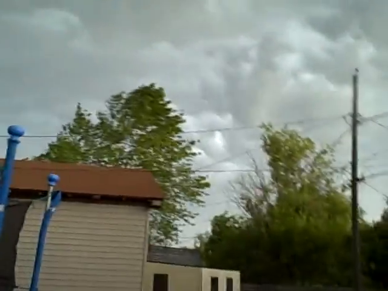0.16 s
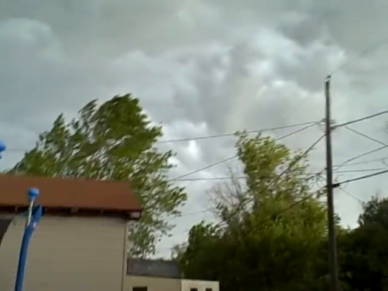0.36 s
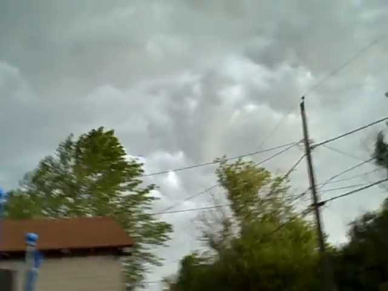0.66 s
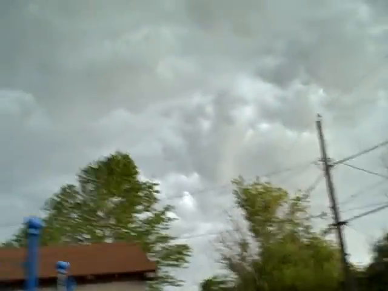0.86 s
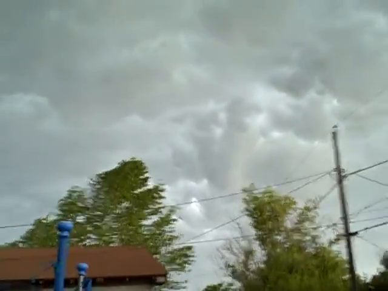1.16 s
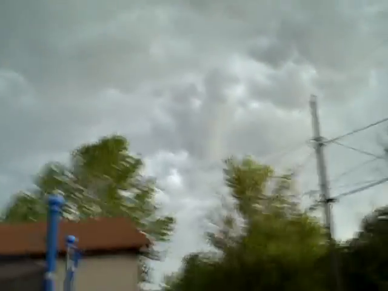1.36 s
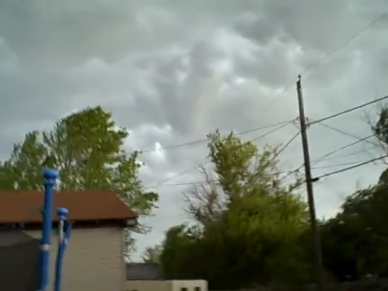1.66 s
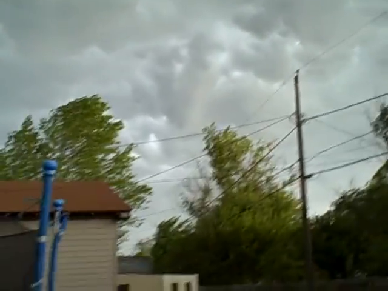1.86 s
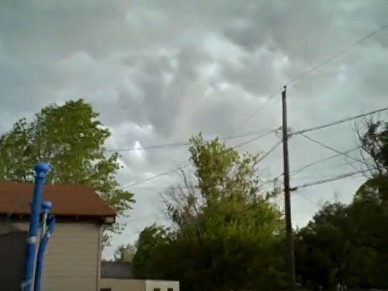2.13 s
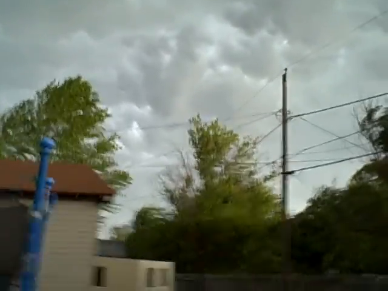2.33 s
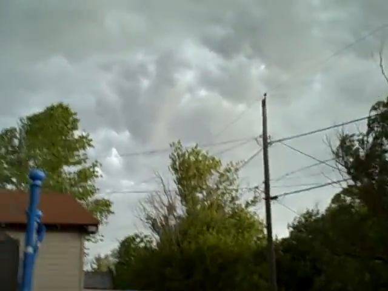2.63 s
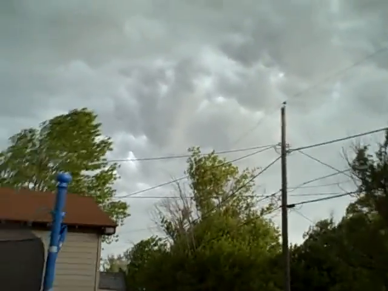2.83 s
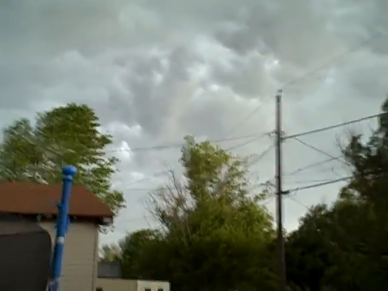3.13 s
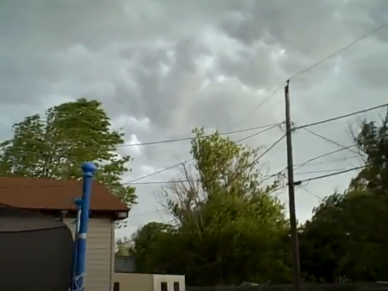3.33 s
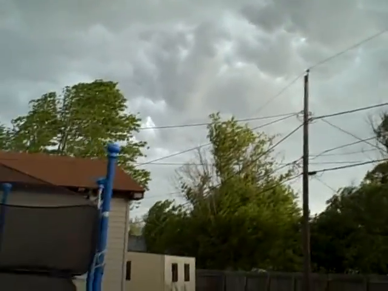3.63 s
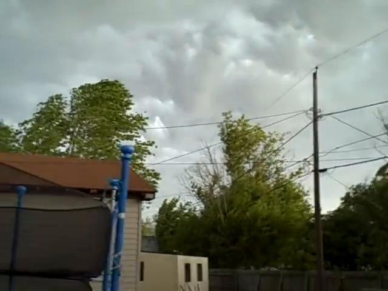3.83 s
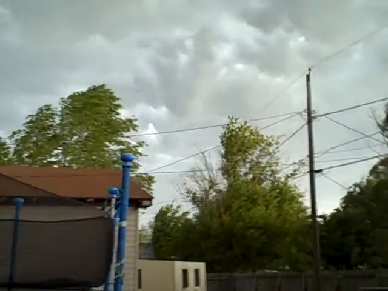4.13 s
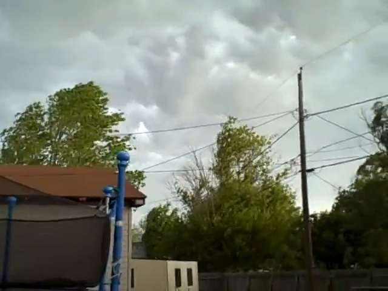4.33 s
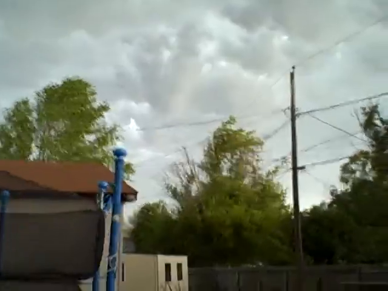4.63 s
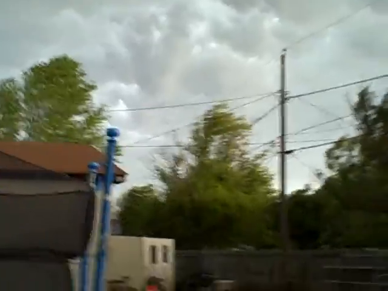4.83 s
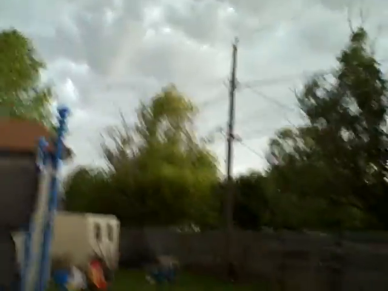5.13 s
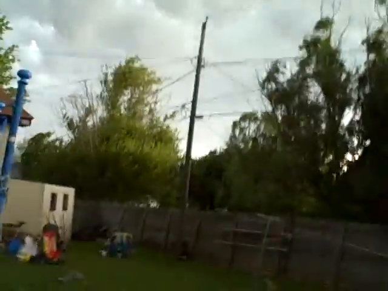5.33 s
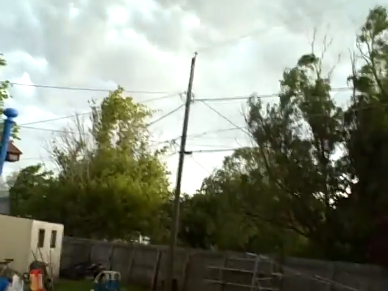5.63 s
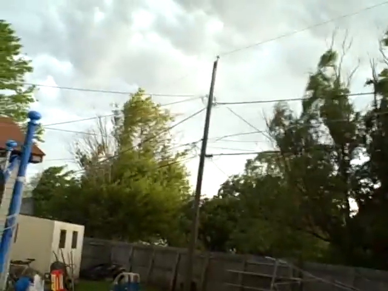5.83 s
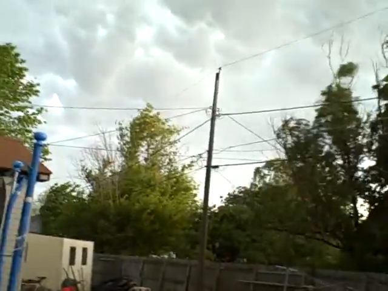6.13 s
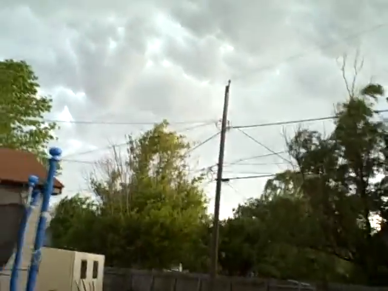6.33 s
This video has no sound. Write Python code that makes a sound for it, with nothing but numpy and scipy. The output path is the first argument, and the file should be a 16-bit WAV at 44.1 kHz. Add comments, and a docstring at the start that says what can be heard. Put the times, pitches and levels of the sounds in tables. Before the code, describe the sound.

Storm gusts slam and rip across a handheld microphone in a back yard, then soft low puffs remain over a leafy, hissing rush.

```python
"""Storm gust in a back yard

For three seconds wind beats straight on the microphone: deep pressure lumps, a flutter of small eddies,
a rough crackle, short rips and hard thumps, with the peaks overloaded. Noise bands make the eddies,
driven by one shared list of gusts; noise bursts make the rips and smooth pressure dips the thumps.
As the buffeting lets go, the rush of thrashing trees comes up: coloured noise with ticking leaf impulses."""
import sys
import numpy as np
from scipy import signal
from scipy.fft import rfft, irfft, next_fast_len
from scipy.io import wavfile
from scipy.ndimage import uniform_filter1d, map_coordinates

SR = 44100
rng = np.random.default_rng(int(sys.argv[2]) if len(sys.argv) > 2 else 0)


def inscribe(sig):
    """Save sig as 16-bit PCM at rate SR to the path in sys.argv[1].

    A 1-D sig is mono; a 2-D sig holds one channel per row.
    Samples are clipped to [-1, 1] before scaling.
    """
    pcm = np.round(np.clip(np.atleast_2d(sig).T, -1, 1) * 32767)
    wavfile.write(sys.argv[1], SR, pcm.astype(np.int16))


N = 286209
TIME = np.arange(N) / SR

# The stream of air between the gusts; faster air sheds smaller eddies and so reaches higher:
# (time [s], relative level [dB], reach [Hz])
AIR_STREAM = [(0.0, -24.5, 110), (0.2, -13.5, 303), (0.44, -20, 324), (0.8, -21.5, 447), (1.15, -17, 724),
              (1.53, -21.5, 70), (1.73, -23, 200), (1.85, -17, 400), (2.07, -30.5, 200), (2.25, -17, 282),
              (2.6, -21.5, 345), (2.95, -23, 70), (3.24, -44, 110), (3.45, -28, 90), (4.2, -38, 108),
              (4.6, -33.5, 120), (5.3, -43.5, 70), (6.49, -45, 85)]
# Gusts that hit the microphone: (start [s], length [s], relative level [dB], reach [Hz])
GUST_HITS = [(0.05, 0.044, -8, 340), (0.185, 0.18, -6.5, 514), (0.486, 0.042, -11.5, 493),
             (0.564, 0.038, -18, 674), (0.628, 0.012, -17.5, 450), (0.697, 0.035, -19.5, 760),
             (0.769, 0.01, -14.5, 830), (0.817, 0.079, -15, 720), (0.921, 0.088, -13.5, 420),
             (1.055, 0.14, -14, 900), (1.243, 0.056, -22.5, 820), (1.33, 0.056, -18, 770),
             (1.405, 0.05, -16.5, 805), (1.479, 0.0069, -18, 756), (1.546, 0.033, -19.5, 420),
             (1.607, 0.067, -17, 756), (1.771, 0.06, -17, 510), (1.862, 0.011, -21, 830),
             (1.919, 0.075, -22.5, 523), (2.038, 0.0089, -24.5, 460), (2.104, 0.0091, -21, 820),
             (2.151, 0.014, -21.5, 480), (2.193, 0.026, -18.5, 467), (2.286, 0.043, -23.5, 656),
             (2.371, 0.039, -27.5, 630), (2.435, 0.049, -16.5, 680), (2.509, 0.043, -17.5, 547),
             (2.628, 0.021, -17, 524), (2.685, 0.024, -14.5, 312), (2.793, 0.022, -15, 149),
             (2.894, 0.008, -17.5, 140), (3.036, 0.039, -19.5, 155), (3.338, 0.051, -24.5, 115),
             (3.51, 0.033, -30, 86), (3.7, 0.038, -30, 85), (3.818, 0.015, -25, 115),
             (4.328, 0.11, -27, 151), (4.486, 0.034, -27.5, 125), (4.74, 0.03, -30, 85),
             (4.896, 0.03, -36, 70)]
# Heavy rumble gives way to light puffs between these two times: (start [s], end [s])
SLACKENING = [2.95, 3.25]
# The hardest rips of air across the microphone port:
# (time [s], relative level [dB], length [s], lowpass corner [Hz])
AIR_RIPS = [(0.193, -30, 0.014, 2200), (0.24, -27, 0.034, 1580), (0.375, -30.5, 0.012, 2500),
            (0.395, -25, 0.0037, 2120), (0.64, -24, 0.0025, 2930), (0.739, -33, 0.01, 1700),
            (0.86, -26.5, 0.0095, 2740), (1.11, -23.5, 0.048, 2700), (1.336, -29.5, 0.0073, 2230),
            (1.432, -30.5, 0.024, 2010), (1.623, -31.5, 0.008, 4250), (1.641, -26.5, 0.009, 4400),
            (1.665, -26.5, 0.011, 3360), (1.811, -33, 0.0087, 2500), (2.209, -34.5, 0.0079, 1910),
            (2.314, -36, 0.0087, 1300), (2.452, -30, 0.0045, 2940), (2.541, -37.5, 0.01, 1510),
            (2.645, -42, 0.0065, 2300)]
# Single hard thumps of air: (time [s], relative level [dB], rise [s], fall [s])
AIR_SHOVES = [(.09, 2.5, 0.0013, 0.0026), (.345, 3, 0.0014, 0.0042), (.53, -7, 0.0057, 0.013),
              (.644, -6, .0006, .005), (.887, -4.5, 0.0027, 0.0031), (1.122, -2, 0.0019, 0.011),
              (1.203, -4.5, 0.0042, 0.014), (1.334, -3.5, 0.00042, 0.0039), (1.463, -3.5, 0.005, 0.0053),
              (1.686, -6.5, 0.004, 0.0085), (1.767, -4.5, 0.00083, 0.0016), (2.226, -5, .003, 0.0065),
              (2.74, -2, 0.0011, 0.004)]
# The rush of the trees sinks under the buffeting and comes back:
# (time [s], relative level [dB], extra hiss of the nearest leaves [dB])
TREE_RUSH = [(0, -39.5, -2.5), (.35, -48.5, 6), (.42, -55.5, 3), (.9, -55, 2.5), (1.35, -59.5, 4.5),
             (2.03, -60.5, 3), (2.7, -52.5, 0.5), (3.0, -47, -3), (3.4, -44, -2.5), (3.95, -38.5, -1.5),
             (4.5, -38, -6.5), (5.4, -39, 1.5), (6.49, -39, -1.5)]
# A nearby spray of leaves swishes: (time [s], level [dB], length [s], lowpass corner [Hz])
LEAF_SWISHES = [(4.82, -41.5, 0.013, 11000)]

# Spectra of the eddies, large to small: (frequency [Hz], relative density [dB per Hz])
HEAVY_RUMBLE_SPECTRUM = [(12, 7.5), (24, 6), (45, 1), (85, -10), (130, -12.5), (200, -27), (300, -44),
                         (800, -88)]
LIGHT_PUFF_SPECTRUM = [(18, -1.5), (45, 7), (85, 1.5), (125, -11), (180, -23.5), (300, -37), (600, -67)]
LOW_FLUTTER_SPECTRUM = [(50, -20), (105, -1), (150, 0), (220, -3), (300, -10.5), (480, -32), (1500, -98)]
UPPER_FLUTTER_SPECTRUM = [(150, -21), (280, 0.5), (430, -1), (600, -8), (850, -24.5), (1400, -39),
                          (4000, -63)]
FINE_FLUTTER_SPECTRUM = [(400, -7.5), (700, 6), (1000, -3.5), (1400, -19), (2500, -33.5), (5000, -53.5)]
CRACKLE_SPECTRUM = [(700, -6), (1200, 6), (2200, -7), (3500, -19.5), (6000, -38), (15000, -38)]
# Spectra of the far crowns and the near leaves: (frequency [Hz], relative density [dB per Hz])
TREE_SPECTRUM = [(24, -34), (40, 10), (71, 5.5), (103, 1.5), (129, 6.5), (192, 2.5), (287, 2), (325, 2),
                 (427, -0.5), (670, -0.5), (949, -3), (1020, -3), (2570, -6), (6810, -14.5), (15500, -29.5)]
LEAF_SPECTRUM = [(1100, -20), (2300, 6), (3600, -4), (7500, -6.5), (11000, -9.5), (16000, -10)]

# the five sizes of eddy, by the pitch at which they sound
RUMBLE_HZ, LOW_HZ, UPPER_HZ, FINE_HZ, CRACKLE_HZ = 45, 162, 396, 755, 1583
# every gust jumps up, sags from its onset and lets go; attack and release are as given at PACE_HZ reach
ATTACK_DB_PER_S, SAG_DB_PER_S, RELEASE_DB_PER_S = 1149, 6, 543
PACE_HZ, PACE_FOLLOWS = 500, 0.35   # gusts of lower reach come and go more gently, by this power law
REACH_FOLLOWS = 0.26   # share of a gust's fall in level by which its reach falls too
REACH_STEEPNESS = 5.37   # power law by which eddies beyond the reach die out
SMALL_EDDY_TILT = 0.16   # within the reach, the air favours its smaller eddies by this power law
LULL_DB, LULL_LEAD_S, LULL_WIDTH_S = 3, .02, 0.0089   # the stream lifts off the port just before each gust
BURST_LEAN = 1.14   # a burst rises this much faster, and falls this much slower, than an even swell
OVERLOAD = 0.805   # clipping amplitude
CUTOFF_HZ = 15850


def buffeting(churn_db, rip_db):
    """Wind on the microphone: eddies of all sizes share one churning flow, and the fastest air rips."""
    churn = churn_db * drift(rate=120)
    large = rumble(level_db=1.0, slack_db=-1.5, lurch_db=1.0, churn=churn)
    small = flutter(low_db=-7.0, upper_db=-6.5, fine_db=-10.0, churn=churn)
    rough = crackle(level_db=-4.5, grain_db=7.0, churn=churn)
    return large + small + rough + rips(rip_db) + shoves(gain_db=1.0)


def rumble(level_db, slack_db, lurch_db, churn):
    """Large eddies: deep, heavy and lurching in the gust, lighter puffs once it has passed."""
    slack = np.interp(TIME, SLACKENING, [0, 1])
    heavy = from_db(level_db) * turbulence(HEAVY_RUMBLE_SPECTRUM, churn / 2, span_s=0.059)
    light = from_db(slack_db) * turbulence(LIGHT_PUFF_SPECTRUM, churn / 2, span_s=0.029)
    lurch = from_db(lurch_db * drift(rate=25))
    # equal-power crossfade
    mixed = np.sqrt(1 - slack) * heavy + np.sqrt(slack) * light
    return air(RUMBLE_HZ) * lurch * mixed


def flutter(low_db, upper_db, fine_db, churn):
    """Small eddies shed at the port; the smaller they are, the deeper they drop in a lull."""
    medium = from_db(low_db) * air(LOW_HZ) * turbulence(LOW_FLUTTER_SPECTRUM, churn, span_s=0.042)
    small = from_db(upper_db) * air(UPPER_HZ) * turbulence(UPPER_FLUTTER_SPECTRUM, churn, span_s=0.055)
    finest = from_db(fine_db) * air(FINE_HZ) * turbulence(FINE_FLUTTER_SPECTRUM, churn, span_s=0.024)
    return medium + small + finest


def crackle(level_db, grain_db, churn):
    """The fastest air breaks up into a rough crackle."""
    grain = churn + grain_db * drift(rate=470)
    return from_db(level_db) * air(CRACKLE_HZ) * turbulence(CRACKLE_SPECTRUM, grain, span_s=0.022)


def rips(gain_db):
    """Fast air tears across the port in short, grainy bursts of noise."""
    return from_db(gain_db) * bursts(AIR_RIPS, low_hz=480, edge=2.26, grain_db=5.0, fizz_db=-48.5)


def shoves(gain_db):
    """A big eddy hits the port: the pressure drops and then relaxes."""
    out = np.zeros(N)
    for s, db, rise, fall in AIR_SHOVES:
        near = slice(max(int((s - .05) * SR), 0), int((s + .05) * SR))
        t = TIME[near] - s
        width = np.where(t < 0, rise, fall)
        out[near] -= from_db(db) * np.exp(-(t / width) ** 2 / 2)
    return from_db(gain_db) * out


def air(eddy_hz):
    """Strength of the eddies of one size: the stream and all gusts feed them, as far as their reach allows."""
    t = TIME[::32]   # coarse steps are enough for an envelope
    at, flow_db, flow_hz = np.transpose(AIR_STREAM)
    lull = 0
    for start, *_ in GUST_HITS:
        lull = lull + LULL_DB * np.exp(-((t - start + LULL_LEAD_S) / LULL_WIDTH_S) ** 2 / 2)
    stream_db = np.interp(t, at, flow_db)
    stream_hz = np.exp(np.interp(t, at, np.log(flow_hz)))
    feeds = [(stream_db, stream_hz, lull)]
    for start, length, db, reach_hz in GUST_HITS:
        age = t - start
        pace = (reach_hz / PACE_HZ) ** PACE_FOLLOWS
        attack = ATTACK_DB_PER_S * np.maximum(-age, 0)
        release = RELEASE_DB_PER_S * np.maximum(age - length, 0)
        sag = SAG_DB_PER_S * np.maximum(age, 0)
        fall = np.minimum(pace * (attack + release) + sag, 90)
        feeds.append((db, reach_hz, fall))
    power = 0
    for db, reach_hz, fall in feeds:
        ratio = eddy_hz / (reach_hz * from_db(-REACH_FOLLOWS * fall))
        share = ratio ** SMALL_EDDY_TILT / (1 + ratio ** REACH_STEEPNESS)
        power = power + from_db(db - fall) ** 2 * share
    return np.interp(TIME, t, np.sqrt(power))


def turbulence(colour, churn_db, span_s):
    """Air pressure that comes in clumps, as eddies pass one after another."""
    churned = rng.standard_normal(N) * from_db(churn_db)
    return evened(coloured(churned, colour), span_s)


def trees(far_db, near_db):
    """Far crowns merge into a smooth rush; nearer leaves add a fine grain."""
    level, hiss = in_time(TREE_RUSH)
    far = from_db(far_db) * coloured(rng.standard_normal(N), TREE_SPECTRUM)
    near = from_db(near_db + hiss) * leaves(per_s=4600, spread_db=1.0)
    swish = bursts(LEAF_SWISHES, low_hz=5500, edge=1.5, grain_db=3.0, fizz_db=-15)
    return from_db(level) * (far + near) + swish


def leaves(per_s, spread_db):
    """Countless leaves slap each other at random moments, a few harder than the rest."""
    strength = from_db(spread_db * np.minimum(rng.exponential(1, N), 5))
    slaps = strength * rng.choice([-1, 1], N)
    struck = rng.random(N) < per_s / SR
    return coloured(slaps * struck, LEAF_SPECTRUM)


def bursts(rows, low_hz, edge, grain_db, fizz_db):
    """Short grainy swells of noise, each with its own length and brightness, and a thin fizz on top."""
    out = np.zeros(N)
    white = rng.standard_normal(N) * from_db(grain_db * drift(rate=420))
    body = signal.butter(2, low_hz, "high", fs=SR, output="sos")
    slope = signal.butter(1, low_hz, fs=SR, output="sos")
    for s, db, length, corner_hz in rows:
        near = slice(max(int((s - 2 * length) * SR), 0), int((s + 2 * length) * SR))
        top = signal.butter(3, min(corner_hz, .45 * SR), fs=SR, output="sos")
        t = (TIME[near] - s) / length
        lean = np.where(t < 0, BURST_LEAN, 1 / BURST_LEAN)
        swell = np.exp(-np.abs(2 * t * lean) ** edge / 2)
        grain = signal.sosfilt(np.vstack([body, top, slope]), white[near])
        noise = swell * (grain + from_db(fizz_db) * white[near])
        loudness = np.sqrt(np.sum(noise ** 2) / (length * SR) + 1e-20)
        out[near] += from_db(db) * noise / loudness
    return out


def coloured(x, colour):
    """Give a signal a spectrum that falls away beyond its end points; rms 1."""
    hz, db = np.transpose(colour)
    size = next_fast_len(N)
    f = np.maximum(np.fft.rfftfreq(size, 1 / SR), 1)
    skirts = np.minimum(f / hz[0], 1) ** 2 * np.minimum(hz[-1] / f, 1) ** 2
    gain = from_db(np.interp(np.log(f), np.log(hz), db)) * skirts
    return rms_one(irfft(rfft(x, size) * gain, size)[:N])


def evened(x, span_s):
    """Hold the power of a noise steady over a span, keeping its finer lumps."""
    size = max(int(span_s * SR), 2)
    power = uniform_filter1d(uniform_filter1d(x ** 2, size), size)
    return x / np.sqrt(np.maximum(power, 1e-9))


def drift(rate):
    """Smooth chance of spread 1 that takes a new value `rate` times a second."""
    knots = rng.standard_normal(8192)
    curve = map_coordinates(knots, [TIME[::16] * rate], order=3, mode="wrap")
    return rms_one(curve).repeat(16)[:N]


def in_time(rows):
    """Each column of a curve, at every sample."""
    s, *columns = np.transpose(rows)
    return [np.interp(TIME, s, c) for c in columns]


def from_db(db):
    """Decibels to gain."""
    return 10 ** (np.asarray(db) / 20)


def rms_one(x):
    """Scale to unit power."""
    return x / np.sqrt(np.mean(x ** 2) + 1e-20)


def scene():
    """Wind on the microphone in front of the trees."""
    wind = buffeting(churn_db=3.0, rip_db=-1.5)
    rush = trees(far_db=-0.5, near_db=-11.0)
    return (wind + rush)[None]


def record(dry):
    """The strongest pressure peaks are cut flat and sag through the bass cut; the top is cut."""
    clipped = np.clip(dry, -OVERLOAD, OVERLOAD)
    bass_cut = signal.butter(1, 2, "high", fs=SR, output="sos")
    top_cut = signal.ellip(12, .1, 80, CUTOFF_HZ, fs=SR, output="sos")
    return signal.sosfilt(top_cut, signal.sosfilt(bass_cut, clipped))


dry = scene()
out = record(dry)
inscribe(out)
```